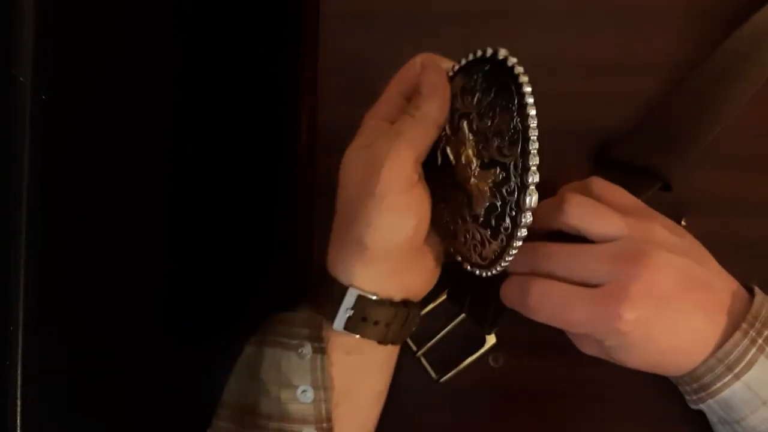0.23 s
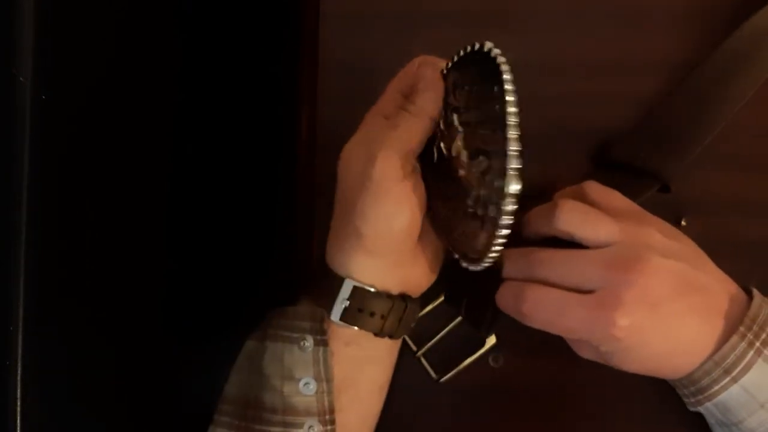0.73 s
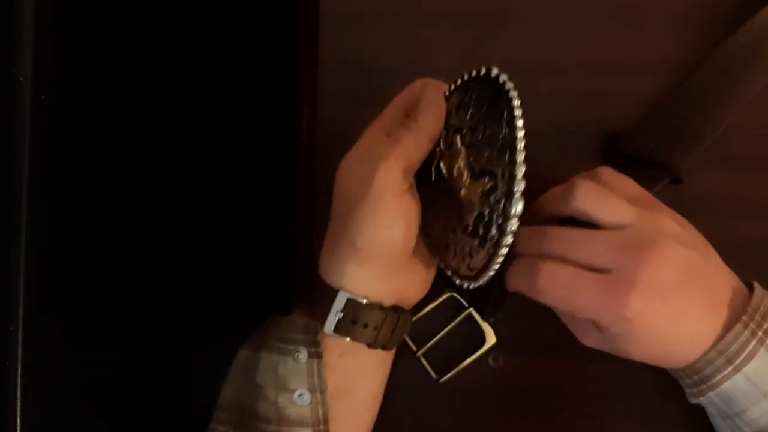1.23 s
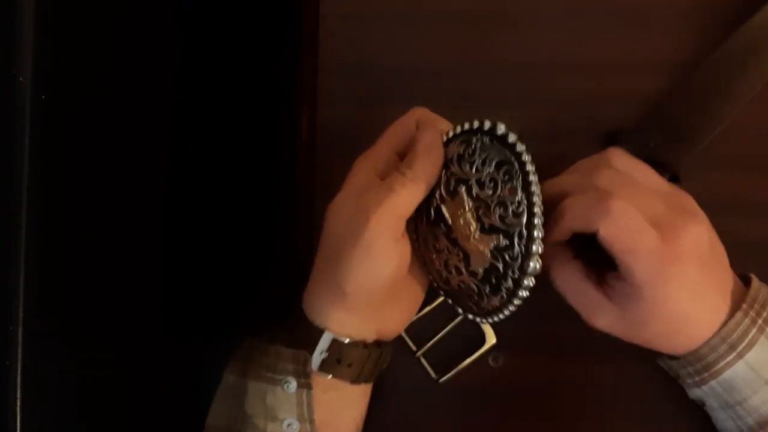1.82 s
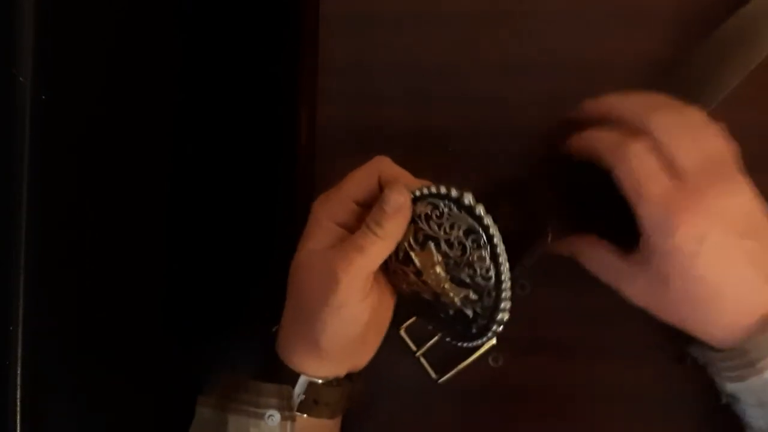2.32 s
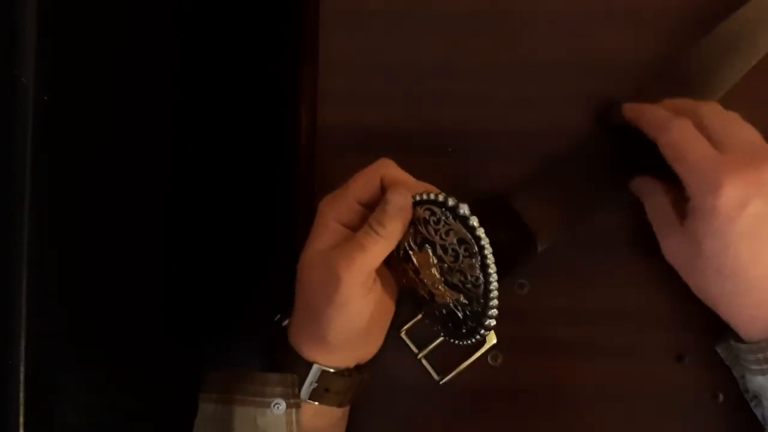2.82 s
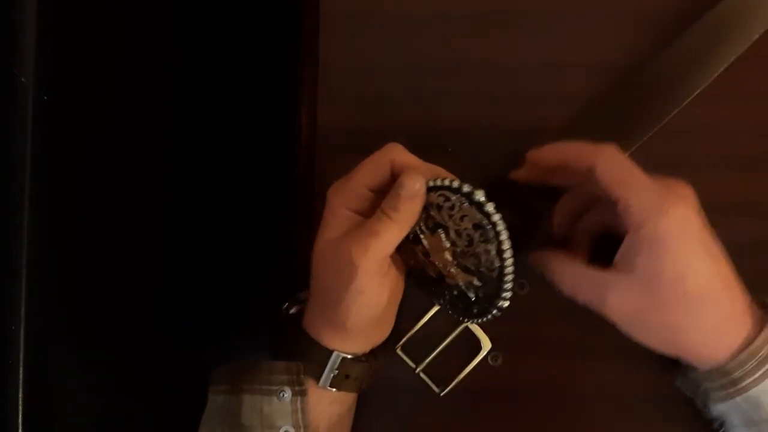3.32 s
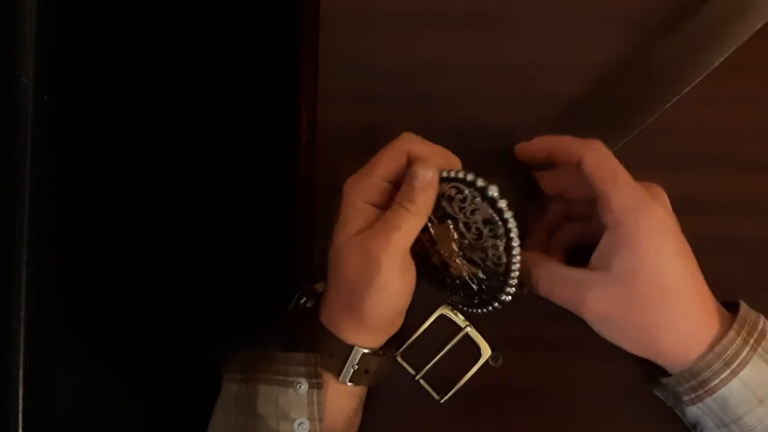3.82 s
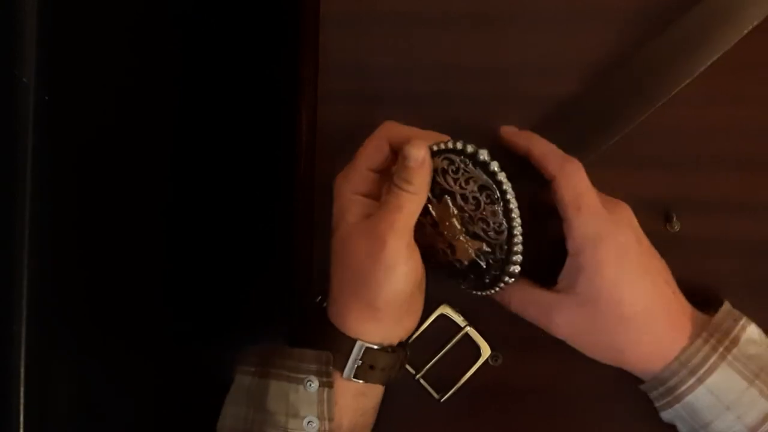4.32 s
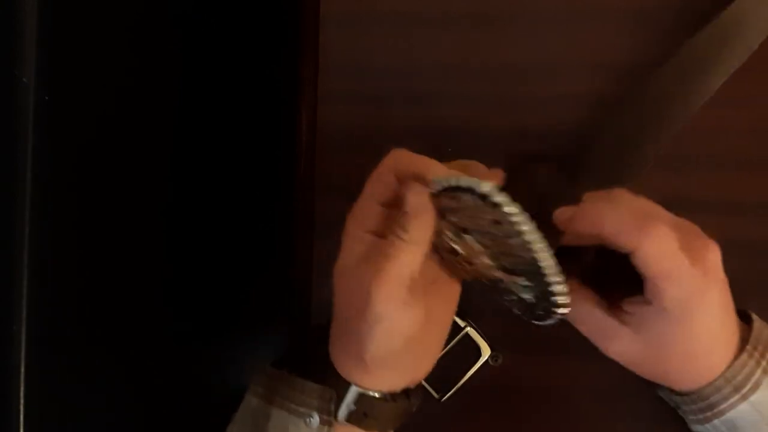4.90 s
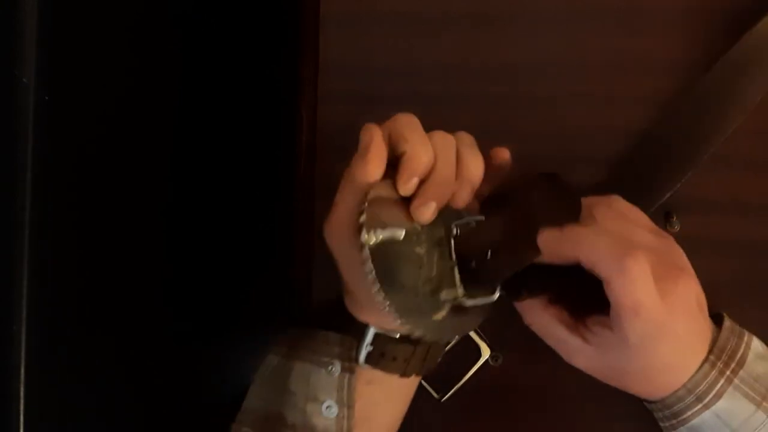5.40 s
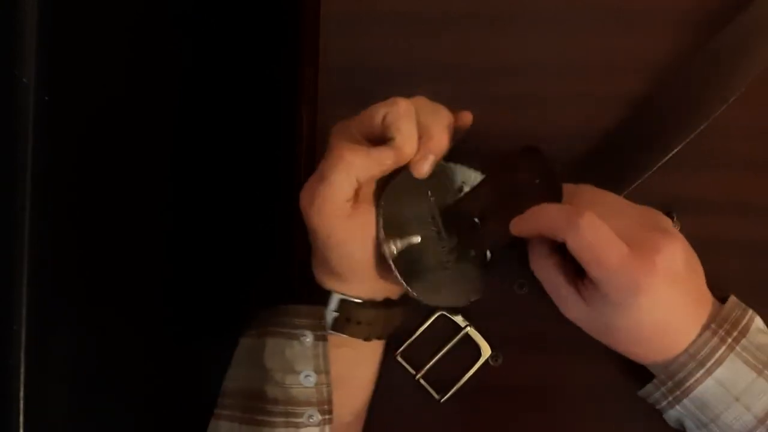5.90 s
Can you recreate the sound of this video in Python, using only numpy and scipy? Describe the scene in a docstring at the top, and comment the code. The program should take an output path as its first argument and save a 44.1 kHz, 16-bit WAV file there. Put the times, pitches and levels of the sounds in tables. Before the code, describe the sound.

A quiet small room with faint low rumble and thin hiss, heard close up in stereo. From 0 to 2.2 seconds a big belt buckle's hinged loop clicks irregularly on its metal plate: tiny, dry, bright ticks with very brief ringing and barely audible scrapes, stronger near 1.0, 1.5, 1.95 and 2.2. At 2.5 the belt's end hits the wooden table, far louder, starting a hollow, uneven clatter until about 3.0, with leather rubbing and the board humming. Scattered softer knocks follow from 3.2, then a pair of hard blows almost together at 3.5, the loudest moment. Near quiet until 4.7, apart from faint touches. From 4.7 to 5.9 the regripped buckle clicks with a different, somewhat less sharp ring, plus slight scraping around 5.45 and 5.8. Stronger clinks at 5.92 and 5.95 join several wooden knocks and a short leather rub by 6.1.

```python
"""First the hinged loop of a big metal belt buckle clicks and scrapes on its plate, ringing in the hand.
Then the belt's end clatters on a wooden table, and leather rubs softly while the board hums along.
After a change of grip the buckle clicks with a different ring, and a few last knocks end the scene.
Hits are struck modes plus a burst of contact noise, heard in a small room; rubs are filtered noise.
A low rumble and a faint hiss, both shaped noise, run throughout."""
import sys
import numpy as np
from scipy import signal
from scipy.fft import rfft, irfft, next_fast_len
from scipy.io import wavfile

SR = 44100
rng = np.random.default_rng(int(sys.argv[2]) if len(sys.argv) > 2 else 0)


def master(y):
    """Save y as 16-bit WAV."""
    cut = np.clip(np.atleast_2d(y).T, -1, 1)
    pcm = np.round(cut * 32767)  # scale
    wavfile.write(sys.argv[1], SR, pcm.astype(np.int16))


N = 271215
T = np.arange(SR // 2) / SR  # the life of one hit [s]

# background spectra: (frequency [Hz], level [dB])
RUMBLE_SPECTRUM = [(12, -49), (20, -28), (43, 3.5), (91, 7.5), (143, 1), (189, -10.5), (274, -10),
                   (343, -20), (448, -25), (536, -21), (603, -35.5), (700, -41.5), (910, -58), (1540, -120)]
HISS_SPECTRUM = [(290, -36.5), (500, -13), (974, -13), (1550, -14), (1870, -21), (2770, -16.5),
                 (3390, -21.5), (3860, -18), (5310, -18), (6610, -23.5), (8330, -29.5), (14900, -10),
                 (16000, -24.5)]
RUMBLE_DB, HISS_DB = -59.5, -76.5
# how alike left and right are in the background: (frequency [Hz], likeness [1 = the same])
FLOOR_LIKENESS = [(60, 0.87), (180, 0.88), (550, 0.3), (1650, 0.01), (4970, 0.04), (15000, 0.01)]
# left against right in the background: (frequency [Hz], left minus right [dB])
FLOOR_BALANCE = [(60, -7.5), (180, -9.5), (550, -9), (1650, -8.5), (4970, 0.5), (15000, -5.5)]

# how alike left and right are in the room sound: (frequency [Hz], likeness [1 = the same])
ROOM_LIKENESS = [(280, 0.93), (500, 0.94), (1200, 0.24), (4000, .05)]
# how long the room's tail takes to fall by 60 dB: (frequency [Hz], decay time [s])
ROOM_DECAY = [(100, 0.62), (400, 0.22), (1500, 0.32), (4000, 0.23), (8000, 0.23), (15000, 0.14)]
ECHO_S = 0.025  # round trip to the nearest wall

# leather sliding: (time [s], level [dB], half length [s])
LEATHER_RUBS = [(2.541, -31, 0.018), (2.701, -48, 0.064), (2.95, -57, .03), (3.2, -63, 0.0063),
                (3.238, -51, 0.05), (3.496, -37.5, 0.012), (4.051, -66.5, 0.046), (5.283, -66.5, 0.061),
                (5.468, -77.5, 0.037), (6.077, -59, 0.024), (6.12, -41, 0.024)]
# sound of the friction itself: (frequency [Hz], level [dB])
LEATHER_SPECTRUM = [(100, -14), (300, -1), (400, 3.5), (700, -1), (1500, -4.5), (3000, -14), (5000, -24),
                    (8000, -35)]

# the loop drags over the plate: (time [s], level [dB], half length [s])
LOOP_SCRAPES = [(0.967, -71, 0.019), (1.526, -68, 0.019), (1.994, -66, 0.014), (5.453, -57.5, 0.019),
                (5.514, -75, 0.021), (5.66, -69, 0.011), (5.797, -63.5, 0.012)]

# blows on the table: (time [s], level [dB], brightness [dB per octave], contact time [ms])
TABLE_KNOCKS = [(2.51, -28.5, 2.5, 0.64), (2.537, -32, -0.06, 0.217), (2.614, -31.5, 1.1, 0.28),
                (2.668, -38.1, 0.5, 0.38), (2.738, -34, -0.86, 0.21), (2.794, -36.5, 2.3, 0.36),
                (2.899, -39, -1.0, 0.28), (2.995, -33, 2.54, 0.31), (3.001, -34.5, 0, 0.27),
                (3.019, -33, 1, 0.27), (3.212, -45, -2, 0.45), (3.302, -38, -0.3, 0.42),
                (3.349, -52, -1.5, 0.19), (3.391, -42, -4.3, 0.16), (3.489, -24.5, 3.6, 0.64),
                (3.499, -24, 3.5, 0.75), (3.715, -49.5, -2.5, 0.87), (4.074, -67, -1.9, 0.321),
                (5.947, -31.5, -0.84, 0.22), (6.01, -33, -1.5, 0.39), (6.029, -36.5, -3.5, 0.18),
                (6.126, -34, -2, 0.27)]
# the tabletop's own tones: (frequency [Hz], strength [dB], decay time at damping 1 [s])
WOOD_MODES = [(109, -10.5, 0.45), (131.8, -9.5, 0.56), (181.5, -7, .6), (307.7, -12.5, 0.99),
              (372.6, -13.5, 0.21), (396.3, 2, 0.38), (448, -6, 0.19), (504, -5.5, 0.21), (552, 4, 0.46),
              (720, 3, 0.087), (860, -11.5, 0.5), (911.6, 3.5, 0.41), (1074, -4, 0.53), (1094, 2, 0.14),
              (1326, -0.5, 0.23), (1420, 2.5, 0.2), (1530, 5, 0.2), (1610, 0, .28), (1510, -4.5, .25),
              (2000, -2.5, 0.49), (2280, -20, .18)]
# contact noise on the wood: (frequency [Hz], level [dB])
THUD_SPECTRUM = [(50, -30.5), (100, 3.5), (200, -12.5), (400, -1.5), (600, -1.5), (780, -7.5), (950, -3.5),
                 (1150, -5), (1550, -1.5), (2400, -5), (4500, -19.5), (7500, -36), (9000, -47.5),
                 (16000, -41.5)]
# band levels of a sharp, neutral blow: (frequency [Hz], level [dB])
TABLE_BAND_LEVELS = [(140, -9.5), (500, -0.5), (1470, -3), (4100, 1), (10580, 3)]
# edges of the bands in which a knock is coloured: (frequency [Hz])
KNOCK_BAND_EDGES = [70, 280, 900, 2400, 7000, 16000]
# left against right at the table: (frequency [Hz], left minus right [dB])
TABLE_BALANCE = [(60, -3), (130, -5), (290, -5.5), (550, -6.5), (1100, -12.5), (2400, -5), (6800, -2.5),
                 (15000, 2)]
# how far left is ahead of right at the table: (frequency [Hz], phase [rad])
TABLE_LEAD = [(100, 0), (280, 0.62), (480, 0.046), (900, 1.5), (2000, 2.9)]
JOLT_DB = -7  # gain of the buckle's ring when the table is struck

# the loop strikes the plate:
# (time [s], level [dB], brightness [dB per octave], contact time [ms], finger damping [1 = free])
LOOP_CLICKS = [(0.0024, -59.5, -6.5, 0.033, 1.16), (0.044, -64.5, 0, 0.14, 3.6),
               (0.1214, -57, 0.5, 0.11, 2.7), (0.386, -55, -6.5, 0.038, 1.3), (0.4082, -55.5, 0, 0.034, 5),
               (0.718, -51.5, -1.9, 0.035, 2.7), (0.9185, -72, -6.5, 0.126, 1.4),
               (1.0023, -48, 2.5, 0.17, 2.2), (1.2286, -65, 1, 0.13, 1.2), (1.2554, -57.5, -5, 0.12, 2.5),
               (1.4705, -72, 1.7, 0.14, 2), (1.5393, -43, 0.5, 0.12, 2.45), (1.6764, -60, 2.5, 0.14, 3.2),
               (1.7113, -60, 1, 0.18, 3.4), (1.8497, -53, -0.7, 0.15, 2.3), (1.949, -45, 2.8, 0.19, 1.9),
               (1.9854, -47, 0, 0.11, 2.2), (2.0298, -54, -0.5, 0.11, 5.3), (2.1313, -57, -3.5, 0.068, 3.8),
               (2.2229, -43, 1.5, 0.17, 2.5), (4.0732, -73.5, -3.5, 0.13, 1.4),
               (4.3321, -66.5, 0, 0.21, 4.0), (4.5531, -77, -7.5, 0.112, 4.5),
               (4.7031, -50.5, 5, 0.15, 1.07), (4.807, -61.1, -2.5, 0.158, 2.6), (4.888, -58, 4, 0.17, 1.4),
               (4.9008, -45.5, 0.7, 0.06, 2.7), (5.0195, -53, -2, 0.05, 2.0),
               (5.2606, -53.5, 6.5, 0.15, 2.7), (5.366, -69.0, 2, 0.17, 2.2), (5.3844, -59, 0, 0.19, 2.8),
               (5.4293, -54, 5, 0.17, 1.8), (5.463, -53, -2.5, 0.043, 2.8), (5.5348, -53, 1.6, 0.23, 3),
               (5.7518, -59.5, -3.5, 0.11, 1.6), (5.7893, -49, -8, 0.059, 2.3), (5.871, -54, 3, 0.18, 2.8),
               (5.9168, -38.5, 2.2, 0.26, 2.6), (5.9474, -37, -4.5, 0.26, 1.55)]
# the buckle's own tones: (frequency [Hz], strength in the first grip [dB],
# strength in the grip for turning it over [dB], decay time when free [s])
BUCKLE_MODES = [(2000, -8.0, -5.0, 0.13), (2055, -10.0, -7.0, 0.15), (2205, -13.0, -14.0, 0.1),
                (2630, -14.0, -4.0, 0.19), (3710, -8.0, -7.0, 0.13), (3900, -8.0, -9.0, 0.08),
                (4042, -5.0, 0.0, 0.2), (4850, -9.0, -8.0, 0.14), (4890, -8.0, -9.0, 0.14),
                (5410, -11.0, -11.0, 0.13), (5995, -12.0, -5.0, 0.15), (7060, 0.0, -7.0, 0.08),
                (7150, -0.0, -5.0, 0.11), (7555, -11.0, -7.0, 0.14), (8320, -14.0, -14.0, 0.12),
                (8660, -24.0, -17.0, 0.12), (9410, -16.0, -6.0, 0.15), (10440, -8.0, -8.0, 0.15),
                (10900, -11.0, -13.0, 0.11), (11185, -8.0, -7.0, 0.15), (11640, -12.0, -16.0, 0.12),
                (12520, -14.0, -17.0, 0.15), (13090, -14.0, -16.0, 0.13), (13650, -11.0, -11.0, 0.14),
                (14220, -19.0, -15.0, 0.12), (14830, -15.0, -23.0, 0.12)]
# one grip each: (frequency [Hz], strength [dB], decay time when free [s])
FACE_UP = [(hz, db, t60) for hz, db, _, t60 in BUCKLE_MODES]
TURNED = [(hz, db, t60) for hz, _, db, t60 in BUCKLE_MODES]
TURN_S = 3.2  # when the grip changes
# the crack of metal on metal: (frequency [Hz], level [dB])
CRACK_SPECTRUM = [(200, -62.5), (900, -16.5), (1600, -19.5), (2100, -9.5), (3100, -13.5), (3900, -4),
                  (4400, -14), (5300, 1.5), (6500, -6.5), (7200, -3.5), (9000, -17.5), (11000, 0.5),
                  (12200, -7.5), (14500, -3), (16000, -47)]
FACE_UP_CRACK_DB, TURNED_CRACK_DB = 8, 4.5  # gain of the crack in each grip
# band levels of a sharp, neutral click, face up and turned: (frequency [Hz], level [dB])
FACE_UP_BAND_LEVELS = [(2330, -7.5), (4560, -2), (7650, 4.5), (12000, 8)]
TURNED_BAND_LEVELS = [(2330, -8), (4560, -0.5), (7650, 0.5), (12000, 4.5)]
# edges of the bands in which a click is coloured: (frequency [Hz])
CLICK_BAND_EDGES = [1700, 3200, 6500, 9000, 16000]
# left against right in the clicks: (frequency [Hz], left minus right [dB])
CLICK_BALANCE = [(2000, -9.5), (4000, -11.5), (7000, -1), (11000, -3.5), (15000, -4.5)]
REBOUND_S, REBOUND_DB = 0.008, -10  # the loop hops once: mean flight time, level of the second touch

CLICK_PIVOT_HZ, KNOCK_PIVOT_HZ = 5000, 800  # brightness tilts the bands about these
TOP_HZ = 15500  # upper limit of the whole sound


def amp(db):
    """Decibels to gain."""
    return 10 ** (np.asarray(db) / 20)


def unit(x):
    """Scale to an average (rms) strength of 1."""
    return x / np.sqrt(np.mean(x ** 2) + 1e-20)


def along(points, hz):
    """Read a curve of (Hz, value) points, with frequency on a log axis."""
    f, v = np.transpose(points)
    return np.interp(np.log(hz + 1), np.log(f + 1), v)


def filtered(x, response):
    """Multiply the spectrum of x by a response that depends on frequency."""
    n = x.shape[-1]
    m = next_fast_len(n + 8192)
    return irfft(rfft(x, m) * response(np.fft.rfftfreq(m, 1 / SR)), m)[..., :n]


def coloured(x, points, size=2048):
    """Filter x to the given (Hz, dB) points without any sound ahead of the hit."""
    cepstrum = irfft(np.log(amp(along(points, np.fft.rfftfreq(size, 1 / SR)))))
    # folding the cepstrum forward makes the filter start at once (minimum phase)
    cepstrum[1:size // 2] *= 2
    cepstrum[size // 2 + 1:] = 0
    pulse = irfft(np.exp(rfft(cepstrum)))
    return signal.fftconvolve(np.atleast_2d(x), pulse[None], axes=1)[:, :x.shape[-1]]


def noise_pair(n, alike, density=1):
    """Left and right noise, as alike as the curve says; at low density, separate spikes."""
    def angle(hz):
        return np.arccos(np.clip(along(alike, hz), -1, 1)) / 2

    white = rng.standard_normal((2, n)) * (rng.random((2, n)) < density)
    mid, side = filtered(white, lambda hz: np.array([np.cos(angle(hz)), np.sin(angle(hz))]))
    return np.array([mid + side, mid - side])


def leaned(x, lean, phase=((1, 0), (2, 0))):
    """Shift level and phase between left and right; positive values favour the left."""
    half = np.array([[.5], [-.5]])
    return filtered(x, lambda hz: amp(half * along(lean, hz)) * np.exp(1j * half * along(phase, hz)))


def add(track, s, hit):
    """Mix a hit into the track at s seconds."""
    start = max(round(s * SR), 0)
    track[:, start:start + hit.shape[1]] += hit[:, :N - start]


def swells(events):
    """Rise and fall of the rubbing pressure: one smooth bump for each event."""
    t = np.arange(N) / SR
    return sum(amp(db) * np.exp(-((t - s) / width) ** 2) for s, db, width in events)


def ring(modes, scatter_db, damping, detune):
    """A struck object's fading tones; each hit varies their strengths and may shift their pitch."""
    hz, db, t60 = np.transpose(modes)[:, :, None]
    hz = hz * (1 + detune * rng.standard_normal(hz.shape))
    strength = amp(db + scatter_db * rng.standard_normal(hz.shape))
    strength = strength * rng.choice([-1, 1], hz.shape)
    t = T[:len(T) // 2]
    fade = np.exp(-np.log(1000) * t * max(damping, .5) / t60)
    tones = np.sum(strength * fade * np.sin(2 * np.pi * hz * t), axis=0)
    return np.pad(tones, (0, len(T) - len(t)))


def burst(spectrum, t60, snap_db):
    """A contact: one sharp snap, with a brief noisy chatter of the surfaces."""
    chatter = rng.standard_normal(len(T)) * np.exp(-np.log(1000) * T / t60)
    size = np.linalg.norm(chatter)
    snap = (T == 0) * size * amp(snap_db)
    contact = coloured(chatter + snap, spectrum)[0]
    return contact * size / np.linalg.norm(contact)


def in_room(x, left_db, near_db, near_t60, echo_db, wet_db, gap_s):
    """Direct sound, quick reflections from table and hands, one wall's echo and the room's tail."""
    noise = noise_pair(len(T), ROOM_LIKENESS)
    hz, t, z = signal.stft(noise, SR, nperseg=256)
    fade = np.exp(-np.log(1000) * t / along(ROOM_DECAY, hz)[:, None])
    tail = signal.istft(z * fade, SR, nperseg=256)[1][:, :len(T)]
    tail = tail * (1 - np.exp(-(T / gap_s) ** 2))  # the tail builds up after a short gap
    near = noise_pair(len(T), ROOM_LIKENESS, density=.06) * np.exp(-np.log(1000) * T / near_t60)
    near = near / np.linalg.norm(near[0])
    close = ((T == 0) + amp(near_db) * near) * amp([[left_db / 2], [-left_db / 2]])
    # the echo is the quick reflections again, later and with left and right swapped
    echo = amp(echo_db) * np.roll(near[::-1], round(ECHO_S * SR), axis=1)
    paths = close + echo + amp(wet_db) * tail / np.linalg.norm(tail[0])
    return signal.fftconvolve(x[None], paths, axes=1)[:, :len(x)]


def contact_colour(edges, colour, pivot_hz, brightness, contact_ms):
    """Band levels [dB]: a hard spot tilts them up; little is excited above 1 / contact time."""
    hz = np.sqrt(np.multiply(edges[:-1], edges[1:]))  # band centres
    softness_db = 10 * np.log10(1 + (hz * contact_ms / 1000) ** 6)
    return along(colour, hz) + brightness * np.log2(hz / pivot_hz) - softness_db


def voiced(hit, edges, levels_db, size=1024):
    """Colour a hit by the gap between its attack's band levels and the wanted ones."""
    power = np.abs(rfft(hit[:, :size].mean(axis=0))) ** 2 * 2 / size ** 2
    hz = np.fft.rfftfreq(size, 1 / SR)
    gains = []
    for lo, hi, wanted_db in zip(edges, edges[1:], levels_db):
        present_db = 10 * np.log10(power[(hz >= lo) & (hz < hi)].sum())
        gains.append((np.sqrt(lo * hi), wanted_db - present_db))
    return coloured(hit, gains)


def background():
    """Steady noise shaped into a low room rumble and a faint hiss."""
    def steady(spectrum):
        return unit(filtered(noise_pair(N, FLOOR_LIKENESS), lambda hz: amp(along(spectrum, hz))))

    rumble = amp(RUMBLE_DB) * steady(RUMBLE_SPECTRUM)
    hiss = amp(HISS_DB) * steady(HISS_SPECTRUM)
    return leaned(rumble + hiss, FLOOR_BALANCE)


def leather():
    """The strap slides in short swells; its friction noise also sets the board humming."""
    friction = unit(filtered(noise_pair(N, ROOM_LIKENESS), lambda hz: amp(along(LEATHER_SPECTRUM, hz))))
    wood = ring(WOOD_MODES, scatter_db=6.5, damping=1.7, detune=.002)
    board = unit(signal.fftconvolve(friction, wood[None], axes=1)[:, :N])
    rub = swells(LEATHER_RUBS) * (amp(-2.0) * friction + amp(-0.5) * board)
    return leaned(rub, TABLE_BALANCE, TABLE_LEAD)


def scraping():
    """Under drag the loop slips in tiny jumps, each a faint tick that mostly wakes the plate's low tones."""
    slips = rng.standard_normal(N) * (rng.random(N) < 500 / SR)  # about 500 slips per second
    held = ring(FACE_UP, scatter_db=0, damping=2.5, detune=0)
    tick = held + amp(7.0) * burst(CRACK_SPECTRUM, t60=.015, snap_db=-29.0)
    grit_colour = [(1400, 2), (2000, 20.5), (3000, 8.5), (6000, 9.5), (14000, -14)]  # (Hz, dB)
    grit = unit(coloured(signal.fftconvolve(slips, tick)[:N], grit_colour)[0])
    scrape = amp(-0.5) * swells(LOOP_SCRAPES) * grit
    return in_room(scrape, left_db=-0.5, near_db=2.5, near_t60=.025, echo_db=3, wet_db=4.5, gap_s=0.012)


def table():
    """The belt's end strikes the wood; the jolt also rings the buckle's lowest tones."""
    track = np.zeros((2, N))
    low_modes = [mode for mode in TURNED if mode[0] < 4500]
    for s, db, brightness, contact_ms in TABLE_KNOCKS:
        wood = ring(WOOD_MODES, scatter_db=3.5, damping=2.62, detune=0.0042)
        thud = amp(22.5) * burst(THUD_SPECTRUM, t60=0.013, snap_db=-0.5)
        metal = amp(JOLT_DB) * ring(low_modes, scatter_db=2, damping=2, detune=.001)
        heard = in_room(wood + thud + metal, left_db=3.5, near_db=6.5, near_t60=0.13,
                        echo_db=-10.5, wet_db=0, gap_s=0.0059)
        bands_db = db + contact_colour(KNOCK_BAND_EDGES, TABLE_BAND_LEVELS, KNOCK_PIVOT_HZ,
                                       brightness, contact_ms)
        add(track, s, voiced(heard, KNOCK_BAND_EDGES, bands_db))
    # the board gives off next to nothing below its lowest tone
    track = signal.sosfilt(signal.butter(3, 65, "high", fs=SR, output="sos"), track)
    return leaned(track, TABLE_BALANCE, TABLE_LEAD)


def grip(s):
    """The grip at s seconds sets the buckle's free tones, its colour and its crack [dB]."""
    if s < TURN_S:
        return FACE_UP, FACE_UP_BAND_LEVELS, FACE_UP_CRACK_DB
    return TURNED, TURNED_BAND_LEVELS, TURNED_CRACK_DB


def rebounding(hit):
    """The hit, and its weaker repeat after a short flight of varying length."""
    flight = round(REBOUND_S * SR * (.5 + rng.random()))
    return hit + amp(REBOUND_DB) * np.pad(hit, (flight, 0))[:len(hit)]


def buckle():
    """The hinged loop clicks on the plate, which rings briefly in the hand."""
    track = np.zeros((2, N))
    for s, db, brightness, contact_ms, damping in LOOP_CLICKS:
        modes, colour, crack_db = grip(s)
        crack = amp(crack_db) * burst(CRACK_SPECTRUM, t60=0.01, snap_db=-6.5)
        metal = ring(modes, scatter_db=3.0, damping=max(damping, 1), detune=0.001) + crack
        heard = in_room(rebounding(metal), left_db=11.5, near_db=12.0, near_t60=0.037,
                        echo_db=-2.5, wet_db=4.5, gap_s=0.0024)
        bands_db = db + contact_colour(CLICK_BAND_EDGES, colour, CLICK_PIVOT_HZ, brightness, contact_ms)
        add(track, s, voiced(leaned(heard, CLICK_BALANCE), CLICK_BAND_EDGES, bands_db))
    return track


def scene():
    """Strap, table and buckle in the quiet room."""
    return background() + leather() + scraping() + table() + buckle()


def record(dry):
    """Cut the treble very steeply above the top limit."""
    return filtered(dry, lambda hz: 1 / np.sqrt(1 + (hz / TOP_HZ) ** 160))


dry = scene()
out = record(dry)
master(out)
```